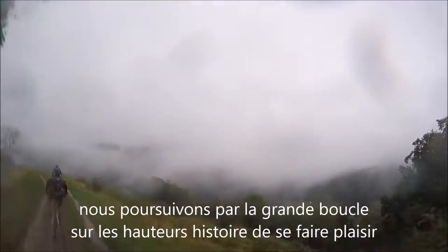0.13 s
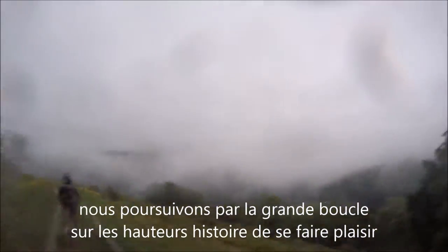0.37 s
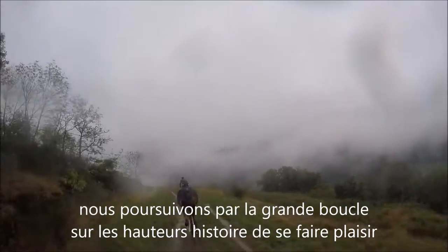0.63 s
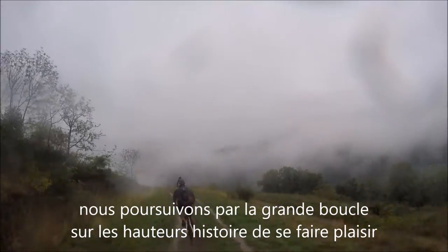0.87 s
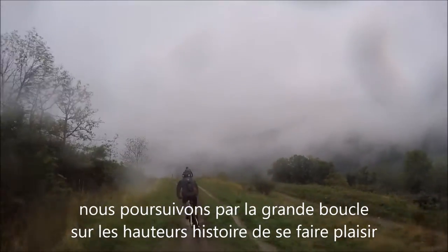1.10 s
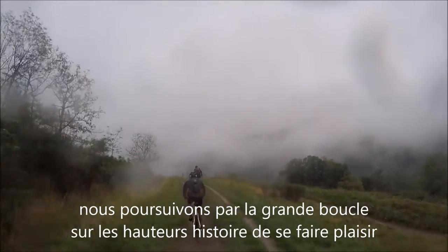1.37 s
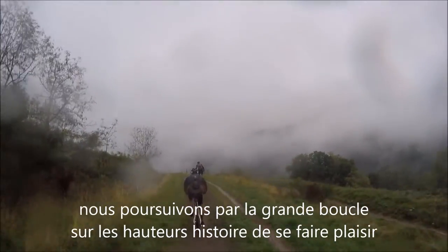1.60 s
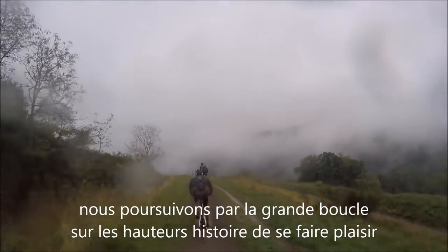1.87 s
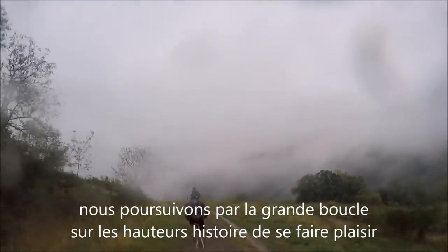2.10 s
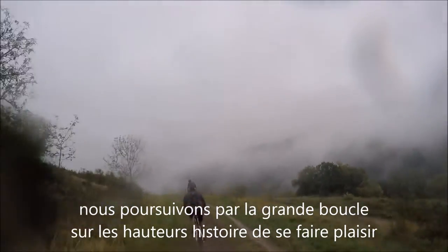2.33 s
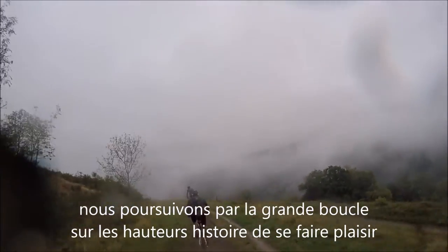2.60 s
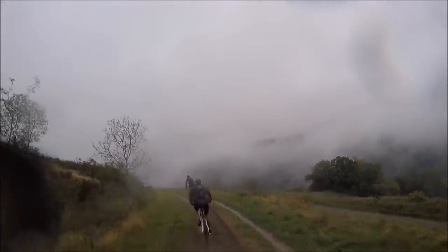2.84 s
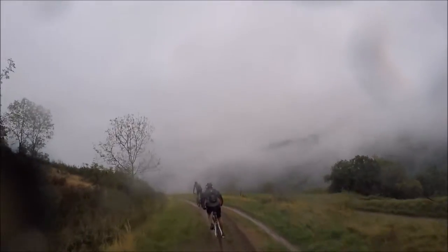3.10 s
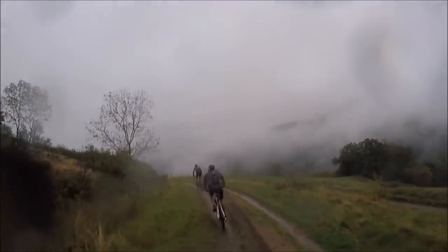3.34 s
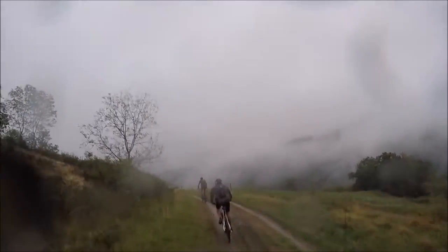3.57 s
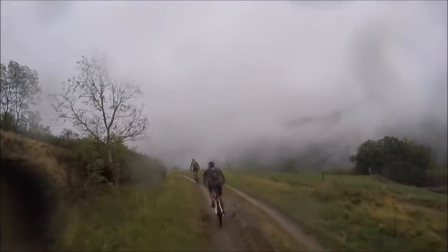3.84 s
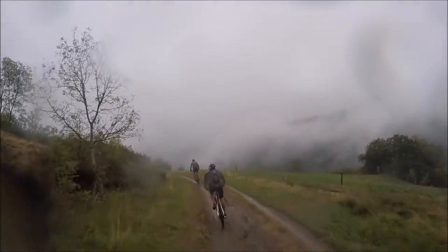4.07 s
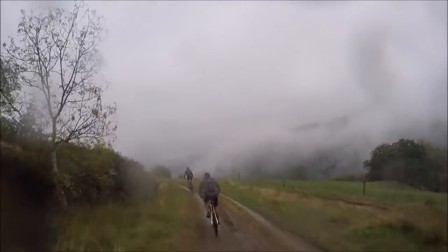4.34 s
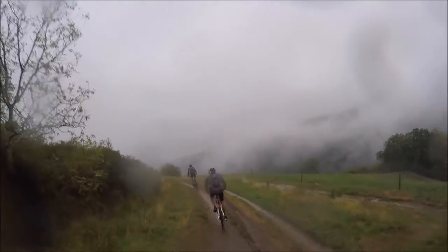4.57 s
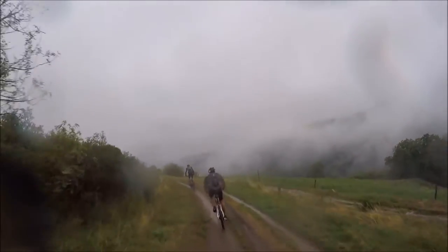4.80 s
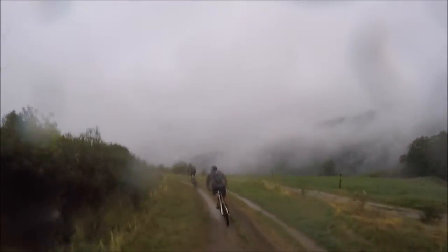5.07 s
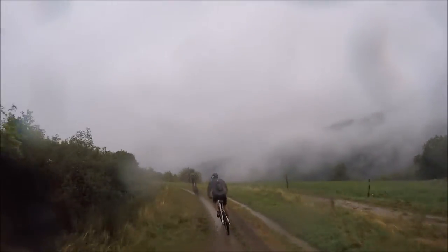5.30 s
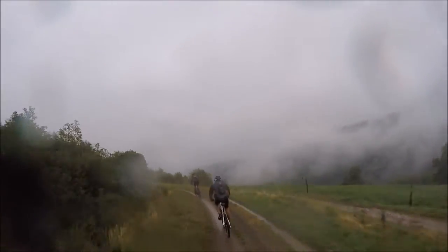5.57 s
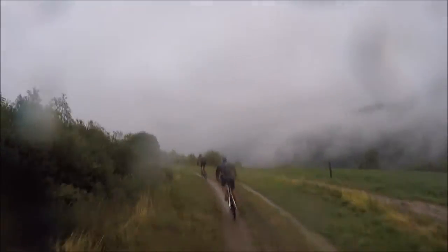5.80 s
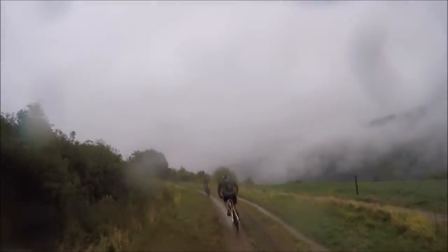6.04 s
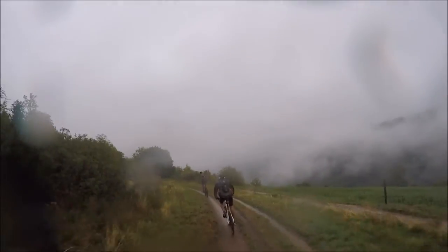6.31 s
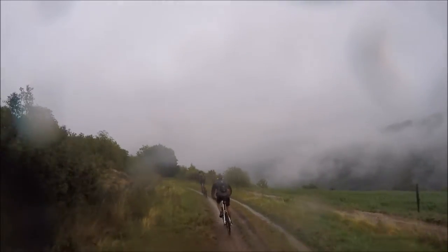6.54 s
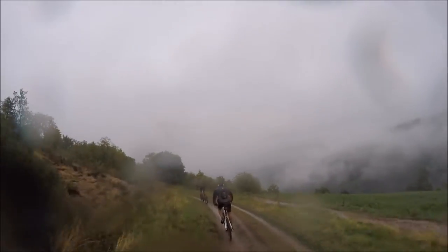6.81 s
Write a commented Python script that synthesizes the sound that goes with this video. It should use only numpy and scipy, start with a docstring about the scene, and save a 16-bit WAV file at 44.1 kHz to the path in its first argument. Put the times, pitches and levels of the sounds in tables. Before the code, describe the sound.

Sharp wet clicks and rattles knock irregularly on a sealed camera housing as a bike rides a rainy track, over faint hiss and low bumping rumble.

```python
"""A camera in a sealed housing rides on a bike along a wet track in the rain, for about seven seconds.
From the start, drops and flung mud excite the damped modes of the housing, each blow with a bright tick;
band-shaped noise gives rain hiss, many faint knocks the spray crackle, and low noise the tyre hum and frame.
Hard knocks come near 1.7, 2.6 and 3.1 s, the strongest shake of the frame near 5.2 s, the hardest knock
near 6.1 s; a dense run of knocks follows from 6.4 s, and the spray weakens at the end."""
import sys
import numpy as np
from scipy import signal
from scipy.fft import rfft, irfft
from scipy.io import wavfile
from scipy.ndimage import uniform_filter1d

SR = 44100
rng = np.random.default_rng(int(sys.argv[2]) if len(sys.argv) > 2 else 0)


def decibels_to_gain(level_db):
    """Convert a level in decibels to a linear amplitude gain (20 dB per decade)."""
    exponent = np.asarray(level_db, float) / 20
    return 10 ** exponent


def dump(signal):
    """Clip the signal to [-1, 1] and save it as 16-bit WAV at the path in sys.argv[1]."""
    limited = np.clip(np.atleast_2d(signal).T, -1, 1)
    pcm = np.round(limited * 32767).astype(np.int16)
    wavfile.write(sys.argv[1], SR, pcm)


N = 305172  # length [samples]

# Drops and mud that stand out on the housing:
# (time [s], ring peak level [dB], ring centre [Hz], tick peak level [dB], relative level of the tick's top [dB])
KNOCKS = [(0.052, -51, 4320, -29.5, -9), (0.199, -19.5, 3040, -55, -18), (.2448, -24.5, 2250, -34, -31),
          (.298, -46, 2400, -33, -5), (0.3052, -18.5, 2500, -31.5, -28), (0.474, -16.5, 2230, -25.5, -28),
          (0.5022, -54, 4350, -27.5, -12), (0.5234, -25.5, 2400, -53, -29), (.5494, -22.5, 3330, -14, -4),
          (.569, -27, 2300, -38, -7), (0.5842, -20, 3180, -21.5, -9), (0.6748, -27, 2040, -42, -24),
          (.739, -21, 2260, -57, -8), (0.811, -38, 2370, -36, 5), (0.8402, -21.5, 2270, -23.5, -7),
          (0.928, -29, 2630, -31.5, -25), (0.994, -31, 1730, -55, -15), (1.0355, -29, 2720, -29, -2),
          (1.1175, -22, 2140, -38, -15), (1.1274, -12, 3500, -18.5, 10), (1.2242, -16, 2270, -17.5, -12),
          (1.28, -23, 2560, -27, -22), (1.32, -15, 2400, -26, -25), (1.3354, -20.5, 2390, -54, -21),
          (1.3533, -14, 2320, -16.5, 1), (1.424, -28.5, 2030, -51, 2), (1.57, -34.5, 3330, -25.5, 0),
          (1.66, -24.5, 2830, -33, -22), (1.67, -25, 2050, -45, -22), (1.7235, -4, 2460, -12, -29),
          (1.7753, -13, 2400, -26.5, -11), (1.833, -40, 3600, -32.5, 10), (1.853, -25.5, 1990, -62, -13),
          (1.861, -22, 2110, -60, -12), (1.8787, -21, 2230, -39, -12), (1.8978, -16.5, 3630, -37, 17),
          (1.982, -25, 1950, -44, -16), (2.009, -30, 2410, -46, -18), (2.0251, -30, 2920, -32.5, -22),
          (2.0525, -20, 3430, -18, -0.5), (2.058, -24, 2570, -44, -18), (2.0964, -28.5, 2520, -47, -9),
          (2.126, -30.5, 2040, -50, -15), (2.2059, -22.5, 2440, -30, -4), (2.228, -12, 3230, -29, 14),
          (2.2537, -27, 2070, -48, -7), (2.3646, -24, 3360, -30.5, -5), (2.413, -14.5, 1810, -35, -29),
          (2.485, -19.5, 2640, -40, -15), (2.532, -30.5, 1600, -60, -15), (2.5534, -29, 4740, -20.5, -7),
          (2.5853, -29.5, 3030, -24.5, -7), (2.6356, -4.5, 4460, -16.5, 35),
          (2.6413, -16.5, 1830, -54, -25), (2.801, -38, 2200, -44, -14), (2.66, -49, 2330, -28, 2),
          (2.8131, -23.5, 2540, -37, -4), (2.8559, -30, 2920, -27, -1), (2.8958, -29, 2710, -27, -3),
          (2.961, -29, 2220, -57, -16), (2.9785, -22.5, 1990, -41, -11), (2.992, -24, 2740, -34.5, -25),
          (3.054, -28, 2580, -44, -19), (3.125, -13.5, 2430, -26, -26), (3.1454, -6, 3450, -11, -19),
          (3.177, -26.5, 2490, -49, -11), (3.2554, -49, 2400, -32, 6), (3.2773, -28, 2280, -21, 8),
          (3.364, -27.5, 2300, -34, 1), (3.5222, -21.5, 2280, -30, -26), (3.5425, -24.5, 2090, -44, -24),
          (3.5775, -12.5, 2250, -22, -12), (3.597, -25, 3750, -19, -3), (3.619, -26.5, 2880, -44, -4),
          (3.65, -31, 3170, -20.5, -2), (3.709, -14.5, 2250, -32.5, 1), (3.734, -22.5, 2450, -39, -10),
          (3.743, -19, 2030, -37, -19), (3.7773, -29, 1650, -53, -13), (3.8306, -30, 2420, -42, -22),
          (3.864, -28.5, 2820, -32.5, -38), (3.916, -13, 3180, -21, 5), (3.964, -33, 2260, -42, -15),
          (3.993, -27.5, 2010, -38, -23), (4.0257, -23.5, 2120, -64, -15), (4.037, -12.5, 2400, -28.5, -6),
          (4.05, -25.5, 2830, -33, -24), (4.1672, -26.5, 2440, -45, -1), (4.2354, -24.5, 2280, -37, -20),
          (4.31, -28.5, 2250, -44, -15), (4.3419, -20.5, 3500, -24.5, -19), (4.36, -21, 3000, -20.5, -8),
          (4.3739, -22, 2470, -42, -11), (4.43, -30.5, 1790, -49, -15), (4.453, -25, 2650, -49, -11),
          (4.4599, -22.5, 4570, -16, -14), (4.488, -24.5, 2580, -32, -10), (4.619, -31, 4700, -23, -3),
          (4.6278, -23.5, 2060, -33, -16), (4.6387, -50, 2630, -29, -2), (4.681, -26.5, 1760, -60, -16),
          (4.78, -26.5, 2110, -44, -31), (4.821, -23.5, 2330, -35, 1), (4.847, -21, 2470, -23.5, -3),
          (4.8618, -14, 2070, -16, -6), (4.8708, -25, 2190, -27.5, -6), (4.9448, -17.5, 4230, -13.5, -7),
          (5.018, -27.5, 1870, -61, -11), (5.0948, -22, 2400, -40, -5), (5.175, -27.5, 2470, -42, -17),
          (5.2227, -14.5, 2180, -48, -19), (5.235, -16.5, 2380, -31, -26), (5.243, -21, 2260, -41, -13),
          (5.3096, -29, 2450, -35, 10), (5.3454, -23, 2500, -29.5, -9), (5.3688, -29, 3670, -30, 11),
          (5.3762, -28, 2800, -26, -8), (5.53, -31, 4930, -25, -10), (5.5551, -22.5, 2160, -29, -12),
          (5.5788, -16.5, 1990, -31, -23), (5.6661, -17.5, 3900, -19.5, 0), (5.684, -28.5, 1700, -63, -28),
          (5.736, -16.5, 1830, -43, -21), (5.869, -27, 2280, -34.5, -20), (5.9827, -22, 3840, -40, -2),
          (6.041, -50, 3900, -41, 6), (6.053, -27, 3940, -39, 3), (6.0656, -3, 3830, -8, -16),
          (6.1135, -28, 2400, -51, -15), (6.124, -29, 2810, -36, -19), (6.134, -20, 2250, -36, -14),
          (6.162, -29, 2290, -38, -15), (6.206, -19, 2400, -36, -20), (6.2172, -25, 2230, -31, -35),
          (6.246, -13.5, 2380, -24.5, -36), (6.385, -45, 3000, -35, 4), (6.3926, -13, 2900, -25, 1),
          (6.416, -20.5, 2170, -48, -17), (6.4305, -16, 3140, -22, -3), (6.44, -25, 2300, -37, -6),
          (6.4525, -15, 3070, -25.5, 13), (6.46, -22, 2830, -27, 12), (6.5018, -12, 4950, -14.5, -19),
          (6.5406, -18, 2700, -35, -11), (6.572, -23, 2600, -36, -19), (6.5941, -29.5, 3070, -33, -8),
          (6.631, -50, 3370, -34, 7), (6.6427, -23.5, 3020, -30, 5), (6.6967, -39, 3350, -34, -4)]
# Normal modes of the housing: (nominal frequency [Hz], relative level [dB], decay time by 60 dB [s])
HOUSING_MODES = [(848, -19, 0.084), (1170, -2, 0.025), (1756, -2.5, 0.022), (1990, 0.5, 0.019),
                 (2250, 9, 0.0096), (2646, 13, 0.005), (3030, 13.5, 0.0026), (3500, 10, 0.0068),
                 (4033, 6.5, 0.0072), (4770, -5, 0.01)]
# Spectrum of the tick: (frequency [Hz], relative level [dB])
TICK_SPECTRUM = [(3000, -13), (5400, 4.5), (6000, 2), (7600, 5), (9000, -6.5), (10500, -26)]
# Top of the tick, raised or lowered for each knock: (frequency [Hz], relative level [dB])
TICK_TOP_SPECTRUM = [(8000, -18), (10500, -7.5), (12500, -10.5), (15000, -7), (16600, -43)]
# Jolts that thump through the mount: (time [s], level before onset and decay [dB], frequency [Hz])
JOLTS = [(1.719, -27, 146), (2.252, -25, 152), (2.641, -31.5, 215), (3.576, -41, 234), (3.701, -28.5, 160),
         (4.858, -32, 198), (5.221, -44, 238), (5.866, -28, 151)]
# Blows that catch a low, hollow ring of the housing:
# (time [s], level before onset and decay [dB], frequency [Hz])
HOLLOW_BLOWS = [(1.722, -30, 870), (2.228, -31.5, 815), (2.412, -33, 1130), (2.68, -31, 850),
                (3.914, -35, 1090), (4.863, -39, 1080), (5.225, -33.5, 954), (5.739, -36, 920),
                (6.065, -33, 1120), (6.247, -32, 830)]
# Course of the spray along the ride: (time [s], hiss level [dB], crackle level [dB])
SPRAY_LEVELS = [(0.0, -54, -54), (.42, -53.5, -51), (.7, -55, -51), (1.6, -58.5, -54), (2.3, -56, -51.5),
                (3.8, -57, -53.5), (4.8, -55.5, -49), (5.7, -56.5, -53), (6.35, -56, -50.5),
                (6.92, -58, -57.5)]
# Rain hiss heard through the housing: (frequency [Hz], relative level per hertz [dB])
HISS_SPECTRUM = [(300, 9), (550, 5), (1200, 7), (1700, 5.5), (2050, 18.5), (2500, 11), (3000, 5.5),
                 (3600, 15.5), (4600, 6), (5400, 9.5), (5900, -2), (7600, 7), (8600, -1), (10500, -7),
                 (12000, -7.5), (15500, -11), (16800, -46)]
# Bumps in the track that shake the frame: (middle time [s], level [dB], width [s])
BUMPS = [(.2, -32.5, 0.17), (.8, -28, 0.055), (1.22, -31, 0.24), (1.61, -21, 0.032), (1.9, -31, 0.027),
         (2.12, -24.5, .07), (2.33, -19, 0.079), (2.68, -26, 0.06), (3.15, -28, 0.1), (3.551, -22, 0.031),
         (3.76, -21.5, 0.045), (3.939, -27, 0.028), (4.47, -27.5, 0.12), (4.802, -32, 0.082),
         (5.03, -20.5, 0.058), (5.162, -12.5, 0.01), (5.57, -30.5, 0.017), (5.769, -21, 0.024),
         (5.889, -18.5, 0.024), (6.09, -24, 0.066), (6.5, -30.5, 0.12), (6.72, -27, 0.1),
         (6.862, -23.5, 0.015)]
# Shaking of the frame: (frequency [Hz], relative level per hertz [dB])
SHAKE_SPECTRUM = [(6, -37.5), (12, 7.5), (24, 6.5), (40, -3.5), (70, -14.5), (120, -29.5), (180, -31.5),
                  (250, -59), (400, -54.5), (900, -130)]
# Tyre hum: (frequency [Hz], relative level per hertz [dB])
HUM_SPECTRUM = [(50, 1), (110, 2), (160, 19.5), (205, -22.5), (240, -14.5), (265, 2), (300, -17.5),
                (550, -24), (1100, -78)]


def knock(ring_db, centre_hz, tick_db, top_db, splat_s, chance):
    """Modal excitation: a wet blow drives the housing modes near its centre, and a bright tick starts it."""
    t = np.arange(1536) / SR
    ring = housing_ring(t, centre_hz, splat_s, chance)
    tick = contact_tick(t, top_db, chance)
    return decibels_to_gain(ring_db) * peaked(ring) + decibels_to_gain(tick_db) * peaked(tick)


def housing_ring(t, centre_hz, splat_s, chance):
    """Linear response: the force of contact and spattering convolved with a sum of damped modes."""
    hz, db, t60 = np.transpose(HOUSING_MODES)[:, :, None]
    count = len(HOUSING_MODES)
    near_db = -28 * np.log2(hz / centre_hz) ** 2
    near_db = near_db + 2.5 * chance[:count, None]
    hz = hz * (1 + 0.03 * chance[count:2 * count, None])  # the wet shell never rings twice alike
    decaying = decibels_to_gain(db + near_db - 60 * t / t60)
    modes = (decaying * np.sin(2 * np.pi * hz * t)).sum(0)

    spatter_decay = decibels_to_gain(-60 * t / splat_s) + decibels_to_gain(-30.5 - 60 * t / 0.062)
    force = chance[-len(t):] * spatter_decay
    force[0] = 0.023 / splat_s  # first contact outweighs the spatter in a short blow
    ring = signal.fftconvolve(force, modes)[:len(t)]

    # the stiff shell passes no lows, and a soft contact no highs
    band_hz = [0.65 * centre_hz, min(1.78 * centre_hz, SR / 4)]
    contact = signal.butter(2, band_hz, "band", fs=SR, output="sos")
    ring = signal.sosfilt(contact, ring)
    return ring * (1 - np.exp(-t / (0.053 * splat_s)))  # water spreads before it presses fully


def contact_tick(t, top_db, chance):
    """Transient broadband excitation: a brief noise burst with a shaped treble spectrum."""
    decay = decibels_to_gain(-60 * t / 0.0025) + decibels_to_gain(-35.5 - 60 * t / 0.044)
    onset = 1 - np.exp(-t / 0.00017)
    burst = chance[-len(t):][::-1] * decay * onset
    bins = np.fft.rfftfreq(len(t), 1 / SR)
    colour = decibels_to_gain(read(TICK_SPECTRUM, bins)) + decibels_to_gain(read(TICK_TOP_SPECTRUM, bins) + top_db)
    delayed = np.roll(burst, 16)  # room for the zero-phase filter to spread backwards
    return irfft(rfft(delayed) * colour)


def knocks():
    """Contact duration against pitch: soft mud splats low and long, hard drops sound high and short."""
    out = np.zeros(N)
    chances = rng.standard_normal((len(KNOCKS), 1600))
    for (s, ring_db, hz, tick_db, top_db), chance in zip(KNOCKS, chances):
        splat_s = 0.0048 + 0.0045 * (2400 / hz) ** 3.74  # time to fall by 60 dB
        add(out, s, knock(ring_db, hz, tick_db, top_db, splat_s, chance))
    return out


def jolts():
    """Impulsive forcing: each jolt through the mount is a soft push of a few low cycles."""
    return damped_tones(JOLTS, t60=0.072, onset_s=0.0013)


def hollow_rings():
    """Low resonance: hollow blows on the housing ring on a little longer than most of its modes."""
    return damped_tones(HOLLOW_BLOWS, t60=0.027, onset_s=0.00043)


def spray():
    """Superposition of incoherent sources: continuous rain hiss and the crackle of tyre spray."""
    hiss = control(SPRAY_LEVELS, column=1) * noise(HISS_SPECTRUM, size=256, patchy_db=4.5)
    return hiss + control(SPRAY_LEVELS, column=2) * crackle(per_s=170, spread_db=7.0)


def crackle(per_s, spread_db):
    """Shot noise: small droplets knock at random moments, in clumps, most of them faint."""
    clumps = decibels_to_gain(4.5 * evened(uniform_filter1d(rng.standard_normal(N), size=1500)))
    kinds = 24  # different droplet knocks, sharing the rate equally
    rate = per_s * clumps / clumps.mean() / kinds / SR  # chance of a droplet per sample
    out = np.zeros(N)
    for chance in rng.standard_normal((kinds, 1600)):
        hz = 2300 * 2 ** (0.22 * chance[40])
        tick_db = -27 + 9 * chance[41]
        splat_s = 0.009 * 2 ** (0.6 * chance[42])
        shape = knock(0, hz, tick_db, -12, splat_s, chance)
        sizes = decibels_to_gain(spread_db * np.minimum(rng.exponential(1, N), 2.6))
        droplets = sizes * (rng.random(N) < rate)
        out += signal.oaconvolve(droplets, shape)[:N]
    return evened(out)


def frame():
    """Forced vibration: bumps add power to the shaking; the hum of knobbly tyres swells a little with it."""
    smooth_db, hum_db = -36, -51  # shaking between the bumps; tyre hum, rms
    t = np.arange(N) / SR
    swells = sum(decibels_to_gain(db) ** 2 * np.exp(-((t - s) / width) ** 2) for s, db, width in BUMPS)
    shaking = np.sqrt(decibels_to_gain(smooth_db) ** 2 + swells)
    hum_gain = decibels_to_gain(hum_db) * evened(shaking ** 0.35)
    hum = hum_gain * noise(HUM_SPECTRUM, size=1024, patchy_db=4.5)
    return shaking * noise(SHAKE_SPECTRUM, size=4096, patchy_db=1.4) + hum


def damped_tones(events, t60, onset_s):
    """Free decay of a single resonance: sines that rise softly and die exponentially."""
    out, t = np.zeros(N), np.arange(4096) / SR
    for s, db, hz in events:
        envelope = decibels_to_gain(db - 60 * t / t60) * (1 - np.exp(-t / onset_s))
        add(out, s, envelope * np.sin(2 * np.pi * hz * t))
    return out


def noise(spectrum, size, patchy_db):
    """Filtered Gaussian noise: random short-time spectra, patchy over time and frequency, at rms 1."""
    frames, hz = 4 * N // size + 5, np.fft.rfftfreq(size, 1 / SR)
    real, imaginary, patches = rng.standard_normal((frames, len(hz), 3)).T
    patches = uniform_filter1d(patches, size=9, axis=0)  # over frequency
    patches = evened(uniform_filter1d(patches, size=7, axis=1))  # over time
    gain = decibels_to_gain(read(spectrum, hz)[:, None] + patchy_db * patches)
    spectra = (real + 1j * imaginary) * gain
    sound = signal.istft(spectra, nperseg=size, noverlap=3 * size // 4)[1]
    return evened(sound[:N])


def read(points, hz):
    """Spectral level at hz, interpolated along logarithmic frequency."""
    f, value = np.transpose(points)
    return np.interp(np.log(hz + 1), np.log(f + 1), value)


def control(rows, column):
    """Level course: decibels interpolated linearly in time, as a gain per sample."""
    rows = np.array(rows)
    return decibels_to_gain(np.interp(np.arange(N) / SR, rows[:, 0], rows[:, column]))


def evened(x):
    """Power normalisation: scaled to rms 1."""
    return x / np.sqrt(np.mean(x ** 2) + 1e-20)


def peaked(x):
    """Peak normalisation: scaled to peak 1."""
    return x / abs(x).max()


def add(mix, s, sound):
    """Superposition: mixes a sound in at time s, in place."""
    part = mix[max(round(s * SR), 0):][:len(sound)]
    part += sound[:len(part)]


def scene():
    """Linear superposition: everything reaches the one microphone through the housing."""
    return (knocks() + spray() + frame() + jolts() + hollow_rings())[None]


def low_pass(x):
    """Removes everything above the highest recorded frequency."""
    return signal.sosfilt(signal.butter(12, 16970, fs=SR, output="sos"), x)


def record(dry):
    """Amplitude limiting: the hardest knocks clip the input."""
    ceiling = decibels_to_gain(-6.6)
    mix = np.clip(dry, -ceiling, ceiling)
    return low_pass(mix)


dry = scene()
out = record(dry)
dump(out)
```